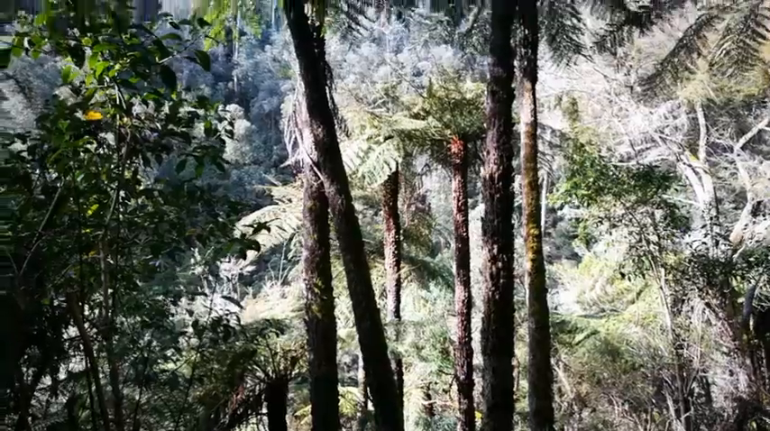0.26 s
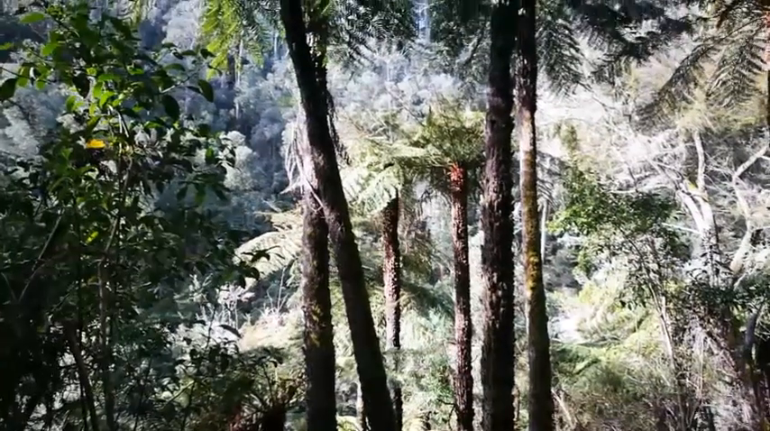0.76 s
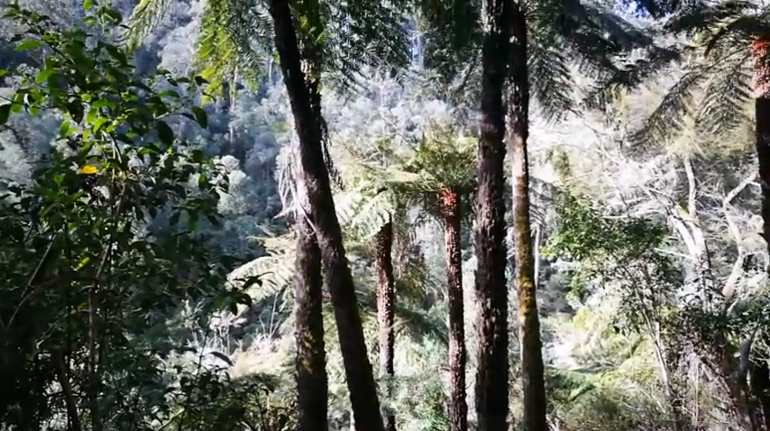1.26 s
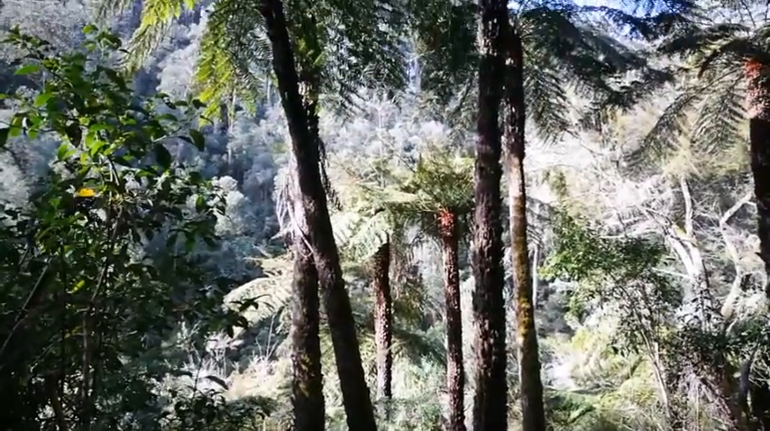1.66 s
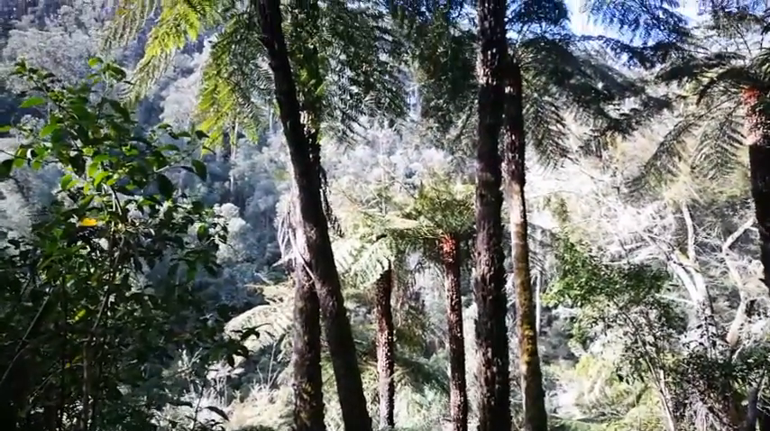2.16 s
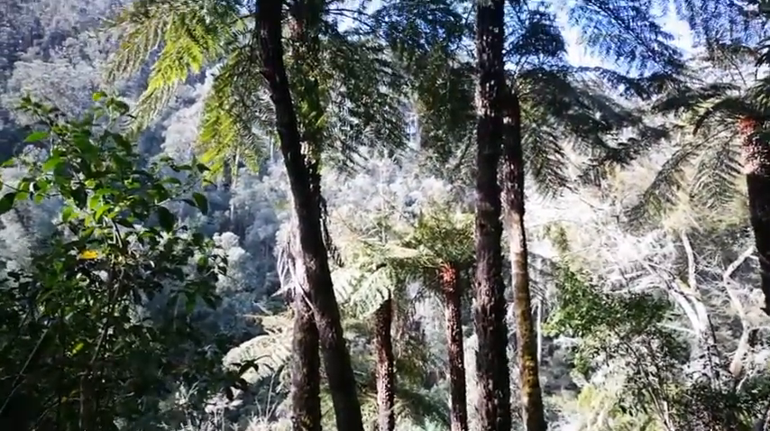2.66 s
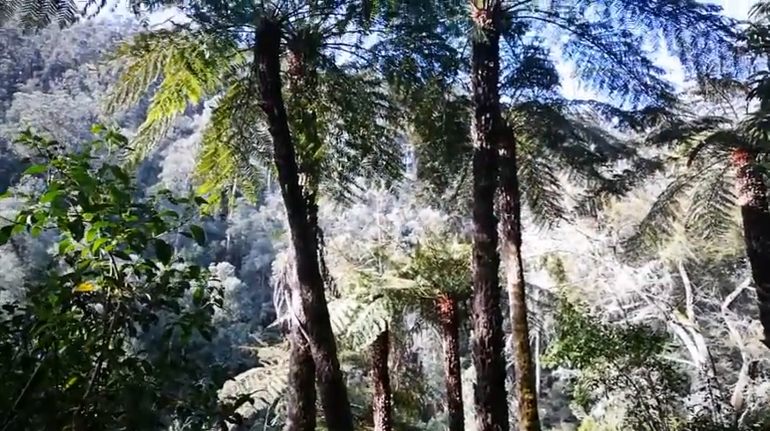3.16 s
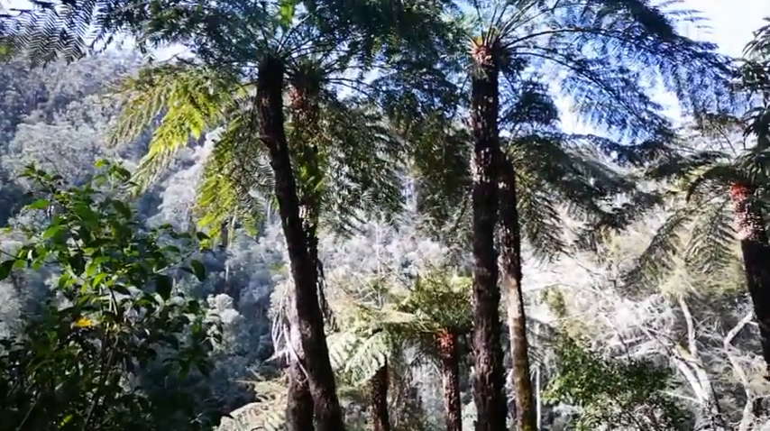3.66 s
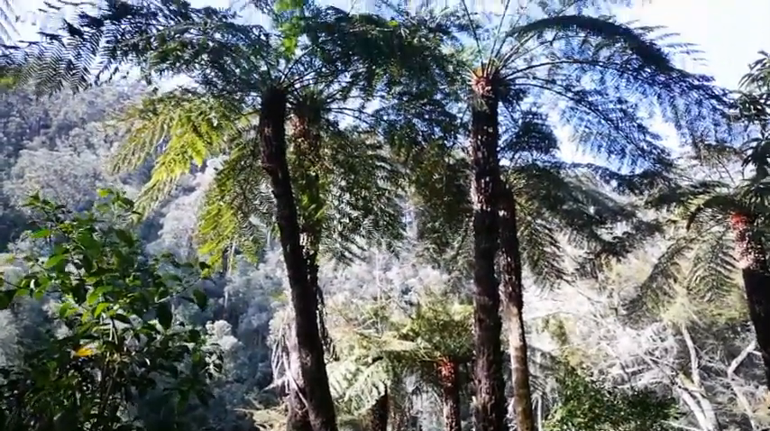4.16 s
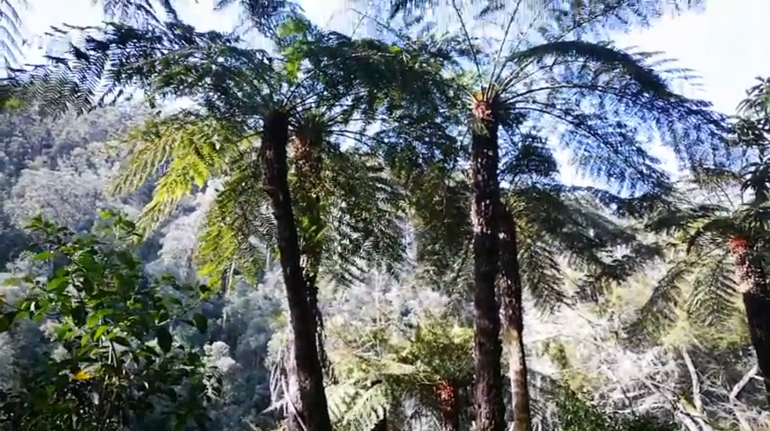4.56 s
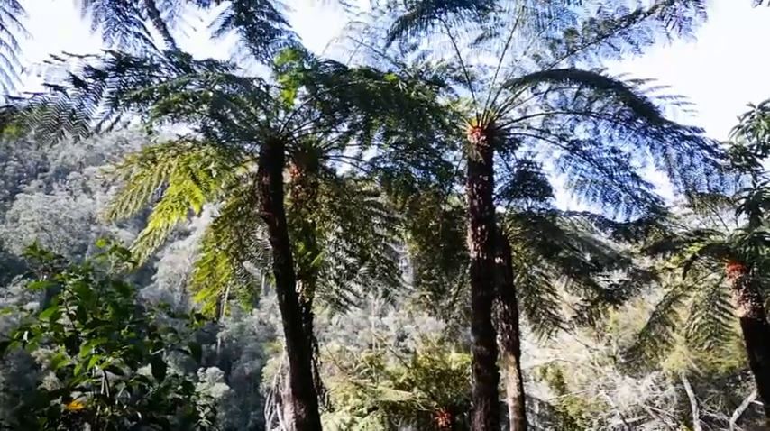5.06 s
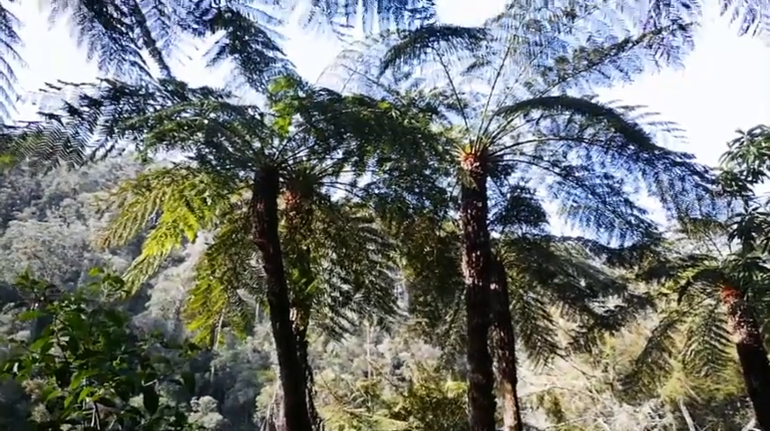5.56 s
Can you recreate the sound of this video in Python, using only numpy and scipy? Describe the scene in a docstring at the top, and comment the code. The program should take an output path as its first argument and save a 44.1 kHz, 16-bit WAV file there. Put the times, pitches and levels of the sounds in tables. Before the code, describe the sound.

Twice, a long high bird whistle snaps into a whip-like crack, followed by a second bird's quick reply, with soft steady hiss behind.

```python
"""In the bush, a small loudspeaker close to the left microphone port loops one phrase of a whipbird duet:
a thin rising whistle, a whip-crack sweep, the mate's two notes and buzzy chips. Notes are gliding sines,
chips are noise through throat resonances; all ring among trees, over the loop's own hiss.
The right port hears the loudspeaker later and duller, round the housing. Faint air, a puff of wind,
a twig tick and a far bird belong to the place itself."""
import sys
import numpy as np
from scipy import signal
from scipy.fft import rfft, irfft, next_fast_len
from scipy.io import wavfile

SR = 44100
rng = np.random.default_rng(int(sys.argv[2]) if len(sys.argv) > 2 else 0)


def transcribe(u):
    """Save the signal u as a 16-bit wav file named by the first command-line argument.

    u: samples, shape (n,) or (channels, n), limited to [-1, 1]; the rate is SR.
    q: integer samples, one column per channel.
    """
    v = np.clip(np.atleast_2d(u).T, -1, 1)
    q = np.round(v * 32767).astype(np.int16)
    wavfile.write(sys.argv[1], SR, q)


N = 256088
PHRASE_START_S, PHRASE_S = 3.278, 3.765


def syrinx(rows):
    """A gliding sine and its octave overtone. Returns the sound and its send to the trees.
    Each row: time in seconds, pitch in Hz, level in dB, overtone in dB, send in dB."""
    s, hz, db, overtone_db, send_db = np.transpose(rows)
    t = np.arange(s[0], s[-1], 1 / SR)
    pitch_hz = np.exp(np.interp(t, s, np.log(hz)))
    phase = 2 * np.pi * np.cumsum(pitch_hz) / SR
    wave = np.sin(phase) + from_db(np.interp(t, s, overtone_db)) * np.sin(2 * phase)
    fades = np.clip(np.minimum(t - s[0], s[-1] - t) / .0044, 0, 1)
    sound = np.sqrt(2) * from_db(np.interp(t, s, db)) * fades * wave
    return sound, from_db(np.interp(t, s, send_db)) * sound


def thin_tone(rows, overtone_db=-50, send_db=-15):
    """A nearly pure syrinx note from rows of time, pitch and level."""
    return syrinx([(*row, overtone_db, send_db) for row in rows])


# Whip-crack sweep. Each row: time in seconds, pitch in Hz, relative level in dB.
WHIP_SWEEP = [(1.172, 722, -55), (1.215, 796, -55), (1.236, 969, -41.5), (1.25, 1256, -36),
              (1.263, 1713, -35.5), (1.273, 2310, -30), (1.281, 3085, -28.5), (1.288, 4370, -24.5),
              (1.292, 5520, -29.5), (1.298, 6200, -42), (1.31, 6710, -38)]


def whip(throat_hz=5600):
    """A fast upward sweep, driest where loudest; the overtone swells through the throat resonance."""
    s, hz, db = np.transpose(WHIP_SWEEP)
    octaves_off = np.abs(np.log2(2 * hz / throat_hz))
    overtone_db = -11.5 - 19 * octaves_off
    send_db = -4.5 + .4 * (db.max() - db)
    return s[0], *syrinx(np.c_[s, hz, db, overtone_db, send_db])


# Rasp resonances. Each row: centre in Hz, width in Hz, relative level in dB.
RASP_BANDS = [(119, 250, -26), (1240, 280, -5), (4230, 2300, 9), (6930, 580, 3), (9060, 240, -7),
              (11200, 2600, -12), (13300, 600, -10), (15500, 400, -23)]


def rasp(peak_s=1.275, lead_s=.04, hold_s=.017, rise_db_per_s=1300, fall_db_per_s=600):
    """Resonant noise at the crack of the whip: steep rise, short hold, slower fall."""
    t = np.arange(0, .15, 1 / SR) - lead_s
    noise = rng.standard_normal(len(t))
    body = sum(from_db(db) * rms_one(formant(noise, hz, width_hz)) for hz, width_hz, db in RASP_BANDS)
    level_db = -34.5 + rise_db_per_s * np.minimum(t, 0) - fall_db_per_s * np.maximum(t - hold_s, 0)
    return peak_s - lead_s, from_db(level_db) * rms_one(body)


# Whistle climbing in small steps. Each row: time in seconds, pitch in Hz, relative level in dB.
WHISTLE_CLIMB = [(3.678, 4317, -66), (3.69, 4510, -58.5), (3.80, 4554, -53.5), (3.869, 4670, -59),
                 (3.939, 4743, -64), (3.99, 4823, -58.5), (4.08, 4890, -63), (4.24, 5014, -65),
                 (4.28, 5070, -56.5), (4.405, 5076, -56), (4.425, 5150, -59), (4.45, 5200, -58.5),
                 (4.519, 5194, -53), (4.6, 5296, -51.5), (4.681, 5373, -50), (4.778, 5340, -56)]
WAVER_PER_S = 70


def rising_whistle(wobble_hz=16):
    """A long thin note whose pitch trembles a little around its line."""
    s, hz, db = np.transpose(WHISTLE_CLIMB)
    t = np.sort(np.r_[np.arange(s[0], s[-1], 1 / WAVER_PER_S), s])
    pitch_hz = np.interp(t, s, hz) + wobble_hz * rng.standard_normal(len(t))
    sound, send = thin_tone(np.c_[t, pitch_hz, np.interp(t, s, db)])
    return s[0], sound * waver(len(sound)), send


def waver(size, share=.45):
    """Moving air between the trunks adds a wandering second path: a gain that flickers and dips."""
    knots = round(size / SR * WAVER_PER_S) + 2
    position = np.linspace(0, knots - 1, size)
    draws = rng.standard_normal((2, knots))
    in_phase, quadrature = (np.interp(position, np.arange(knots), draw) for draw in draws)
    return rms_one(np.hypot(1 + share * in_phase, share * quadrature / 2))


# Note before the whistle. Each row: time in seconds, pitch in Hz, relative level in dB.
WHISTLE_LEAD_IN = [(3.52, 4230, -62), (3.53, 4360, -51), (3.545, 4510, -55), (3.59, 4545, -67)]
# End of the whistle. Each row: time in seconds, relative level in dB.
WHISTLE_CLOSE = [(4.775, -56), (4.783, -39.5), (4.798, -43), (4.808, -55), (4.826, -43), (4.862, -46),
                 (4.89, -55), (4.922, -57), (4.94, -66)]


def whistle_ends(close_hz=5316):
    """A short lead-in note, and a loud close on one pitch: two pulses and a faint tail."""
    close = [(s, close_hz, db) for s, db in WHISTLE_CLOSE]
    return [(rows[0][0], *thin_tone(rows)) for rows in (WHISTLE_LEAD_IN, close)]


# Effort of the falling note. Each row: time in seconds, relative level in dB.
FALL_EFFORT = [(1.848, -44), (1.856, -45), (1.879, -36), (1.902, -35.5), (1.918, -39), (1.931, -48),
               (1.941, -58)]


def falling_note(from_hz=3763, to_hz=1212, hold_s=.031, overtone_db=-45, send_db=-1):
    """The mate holds a pitch, then slides straight down."""
    s, db = np.transpose(FALL_EFFORT)
    t = np.arange(s[0], s[-1], .002)
    hz = np.interp(t, [s[0] + hold_s, s[-1]], [from_hz, to_hz])
    return s[0], *thin_tone(np.c_[t, hz, np.interp(t, s, db)], overtone_db, send_db)


# Dipping note. Each row: time in seconds, pitch in Hz, relative level in dB, overtone in dB.
DIP_GLIDE = [(2.083, 3830, -47, -42), (2.112, 3050, -40.5, -44), (2.128, 2869, -38, -32),
             (2.143, 2980, -44, -35), (2.152, 3384, -37, -8), (2.162, 4000, -48.5, -23),
             (2.18, 4130, -38, -18), (2.21, 4175, -34, -37), (2.255, 4205, -39, -32),
             (2.30, 4140, -55.5, -24), (2.329, 4180, -68, -25)]


def dipping_note():
    """The mate's pitch dips and climbs; the loud high end stands furthest out of its echo."""
    s, hz, db, overtone_db = np.transpose(DIP_GLIDE)
    send_db = np.minimum(-11.5 + 2.16 * (db.max() - db), 2)
    return s[0], *syrinx(np.c_[s, hz, db, overtone_db, send_db])


# Buzzy chips. Each row: start in seconds, length in seconds, relative level in dB.
CHIP_CALLS = [(1.817, 0.027, -49), (2.045, 0.02, -46.5), (3.224, .055, -54.5)]
# Throat resonances. Each row: centre in Hz, width in Hz, gain in dB.
THROAT_BANDS = [(3200, 1100, -5), (4480, 380, 3), (5600, 900, -8), (6900, 800, -4)]


def chips(pulse_hz=134.4, send_db=-2.5):
    """Short bursts of throbbing breath noise through the throat resonances."""
    for start_s, length_s, level_db in CHIP_CALLS:
        t = np.arange(0, length_s, 1 / SR)
        breath = rng.standard_normal(len(t)) * (1 + .16 * np.sin(2 * np.pi * pulse_hz * t))
        voiced = sum(from_db(db) * formant(breath, hz, width_hz) for hz, width_hz, db in THROAT_BANDS)
        voiced = butterworth(voiced, 6, 8000)
        fades = np.clip(np.minimum(t, length_s - t) / .008, 0, 1)
        sound = from_db(level_db) * rms_one(voiced) * fades
        yield start_s, sound, from_db(send_db) * sound


# Ringing among the trunks. Each row: band centre in Hz, near echo level in dB, near T60 in seconds,
# far echo level in dB, far T60 in seconds.
TREE_ECHOES = [(844, -16, 0.11, -8.5, 0.3), (1820, -1.5, 0.067, -8.5, 1.2), (3140, -0.5, 0.2, -6, 0.98),
               (4300, 2.5, 0.24, -7, 1.57), (6160, 7.5, 0.27, -5.5, 1.5), (10040, 9.5, 0.29, -38, .4)]


def trees(send, trunks_per_s=5000):
    """Separate trunks return a dense, grainy scatter of echoes that dies band by band."""
    t = np.arange(2 * SR) / SR
    centres_hz = np.array(TREE_ECHOES)[:, 0]
    edges_hz = np.r_[300, np.sqrt(centres_hz[1:] * centres_hz[:-1]), 16000]
    trunks = rng.random((2, len(t))) < trunks_per_s / SR
    echoes = np.zeros(len(t))
    for (_, near_db, near_s, far_db, far_s), low, high in zip(TREE_ECHOES, edges_hz, edges_hz[1:]):
        near, far = butterworth(trunks * rng.standard_normal(trunks.shape), 2, [low, high], "band")
        band_share = (high - low) / (SR / 2)
        for scatter, db, t60_s in ((near, near_db, near_s), (far, far_db, far_s)):
            decay = from_db(-60 * t / t60_s)
            echoes += from_db(db) * rms_one(scatter) * decay * np.sqrt(band_share / np.sum(decay ** 2))
    echoes *= np.clip((t - .001) / .0078, 0, 1)   # ground and twigs answer within a few ms
    return signal.fftconvolve(send, echoes)[:len(send)]


def duet(ground_delay_s=.001203, ground_db=-25):
    """One round of calls with ground and tree echoes, cut off where the loop restarts."""
    t = np.arange(round(PHRASE_S * SR)) / SR
    direct, to_trees = np.zeros((2, len(t)))
    calls = [rising_whistle(), *whistle_ends(), whip(), falling_note(), dipping_note(), *chips()]
    for start_s, sound, send in calls:
        add(direct, phrase_time(start_s), sound)
        add(to_trees, phrase_time(start_s), send)
    add(direct, ground_delay_s, from_db(ground_db) * direct)
    start_s, sound = rasp()
    add(direct, phrase_time(start_s), sound)
    cut = np.clip((t[-1] - t) / .001, 0, 1)
    return (direct + trees(to_trees)) * cut


# Hiss of the loop. Each row: frequency in Hz, relative density in dB.
HISS_SPECTRUM = [(110, -54), (180, -22), (377, -2.5), (595, -1.5), (734, 0.5), (1080, -1), (1590, -7.5),
                 (2300, -8.5), (3210, -6.5), (4900, -7), (6490, -5), (9220, -12.5), (9890, -20),
                 (10600, -30.5), (12000, -32.5), (15600, -67.5), (22000, -120)]


def loop_hiss(size, fade_in_s=.022, sag_db_per_s=1.0):
    """Hiss that comes up quickly at the start of the phrase, then slowly sags."""
    t = np.arange(size) / SR
    level_db = -53.5 - 7 * np.clip(1 - t / fade_in_s, 0, 1) - sag_db_per_s * t
    return from_db(level_db) * coloured(HISS_SPECTRUM, size)


def loudspeaker(gain_db=5.5, right_hiss_db=-4):
    """The looped duet and hiss reach the left port directly, the right port round the housing."""
    phrase = duet()
    looped = (np.arange(N) - round(PHRASE_START_S * SR)) % len(phrase)
    birds = phrase[looped]
    hiss = loop_hiss(len(phrase))[looped]
    right = right_port(birds + from_db(right_hiss_db) * hiss)
    return from_db(gain_db) * np.array([birds + hiss, right])


# Path to the right port. Each row: frequency in Hz, loss in dB, phase lag in radians.
HOUSING_SHADOW = [(20, 0, 0), (200, 1, .2), (250, 1, 1.2), (650, 5.5, 3.1), (1000, 11, 4.5),
                  (1550, 25, 7.5), (2000, 15, 9.3), (2200, 8.5, 10), (2500, 16, 11.8), (2900, 4.5, 11.8),
                  (3200, 11, 12.6), (3550, 5.5, 13.2), (3900, 20, 14.7), (4300, 9, 14.6), (5080, 23, 17.5),
                  (5350, 11, 16.3), (5900, 27, 18.5), (6500, 30, 17.8), (8600, 19, 23), (10500, 12, 28),
                  (16000, 22, 40)]


def right_port(x, scatter_db=-29, scatter_t60_s=.36):
    """The housing shadows and delays the sound; things nearby scatter a little of it back."""
    tail = SR // 2
    size = next_fast_len(N + tail)
    hz = np.arange(size // 2 + 1) * SR / size
    path = from_db(-at_hz(HOUSING_SHADOW, hz)) * np.exp(-1j * at_hz(HOUSING_SHADOW, hz, column=2))
    decay = from_db(-60 * np.arange(tail) / SR / scatter_t60_s)
    scatter = from_db(scatter_db) * rng.standard_normal(tail) * decay / np.sqrt(np.sum(decay ** 2))
    return irfft(rfft(x, size) * (path + rfft(scatter, size)), size)[:N]


# Air of the place. Each row: frequency in Hz, relative density in dB, left-right coherence from 0 to 1.
AIR_SPECTRUM = [(20, 6.5, 1), (32, 3.5, 0.82), (45, -7, .96), (60, 3, 0.99), (80, -8.5, .93),
                (122, -5, 0.66), (250, -22, .5), (600, -2, 0.24), (1410, -0.5, .1), (4000, -54.5, .05),
                (9000, -34, .02), (16000, -22.5, 0.012)]


def air(level_db=-71.5):
    """Faint steady air, alike at both ports in the bass only."""
    hz = np.arange(N // 2 + 1) * SR / N
    coherence = at_hz(AIR_SPECTRUM, hz, column=2)
    mid, side = rfft(rng.standard_normal((2, N)))
    ports = np.sqrt(1 + coherence) * mid + np.sqrt(1 - coherence) * side * [[1], [-1]]
    return from_db(level_db) * rms_one(irfft(ports * from_db(at_hz(AIR_SPECTRUM, hz)), N))


# Puff dying away. Each row: time in seconds, rumble in dB, leaf hiss in dB.
PUFF_LEVELS = [(0, -74, -76), (.4, -72, -77), (.7, -76, -79), (.8, -79, -100), (1.2, -110, -115)]


def wind_puff():
    """Wind rumbles on both ports and stirs the leaves."""
    s, rumble_db, leaves_db = np.transpose(PUFF_LEVELS)
    t = np.arange(N) / SR
    rumble = coloured([(15, -5), (30, -7), (70, -10.5), (200, -16.5), (400, -66)], N)
    leaves = np.array([coloured([(1500, -36), (5000, -5), (10000, -9), (16000, -8)], N) for _ in range(2)])
    return from_db(np.interp(t, s, rumble_db)) * rumble + from_db(np.interp(t, s, leaves_db)) * leaves


def twig_tick(start_s=3.344, left_db=-41, right_db=-33):
    """One soft contact rings two damped resonances of a twig."""
    impulse = np.zeros(N)
    impulse[round(start_s * SR)] = 1
    ring = resonate(impulse, hz=2200, width_hz=700) + resonate(impulse, hz=5300, width_hz=1500)
    tick = butterworth(ring, 2, 8000)
    return from_db([[left_db], [right_db]]) * tick / np.max(np.abs(tick))


# Far bird's note. Each row: time in seconds, pitch in Hz, relative level in dB.
FAR_NOTE = [(4.58, 2620, -80), (4.63, 2580, -69), (4.75, 2465, -68), (4.86, 2400, -80), (4.92, 2430, -86)]


def far_bird(pan_db=3):
    """One faint, slightly sinking whistle to the right."""
    track = np.zeros(N)
    sound, _ = thin_tone(FAR_NOTE)
    add(track, FAR_NOTE[0][0], sound)
    return from_db([[-pan_db], [pan_db]]) * track


def from_db(db):
    """Decibels to gain."""
    return 10 ** (np.asarray(db) / 20)


def rms_one(x):
    """Scale to rms 1."""
    return x / np.sqrt(np.mean(x ** 2) + 1e-20)


def at_hz(points, hz, column=1):
    """Read a spectrum on a log-frequency axis."""
    points = np.array(points)
    return np.interp(np.log(np.maximum(hz, 1)), np.log(points[:, 0]), points[:, column])


def coloured(points, size):
    """Noise of rms 1 shaped to (Hz, dB) points."""
    hz = np.arange(size // 2 + 1) * SR / size
    return rms_one(irfft(rfft(rng.standard_normal(size)) * from_db(at_hz(points, hz)), size))


def resonate(x, hz, width_hz):
    """Two-pole resonance with peak gain 1."""
    r = np.exp(-np.pi * width_hz / SR)
    feedback = [1, -2 * r * np.cos(2 * np.pi * hz / SR), r * r]
    return signal.lfilter(np.array([1, 0, -1]) * (1 - r * r) / 2, feedback, x)


def formant(x, hz, width_hz):
    """Two equal resonances in series."""
    return resonate(resonate(x, hz, width_hz), hz, width_hz)


def butterworth(x, order, hz, kind="low"):
    """Filter with a flat passband."""
    return signal.sosfilt(signal.butter(order, hz, kind, fs=SR, output="sos"), x)


def add(track, start_s, sound):
    """Mix a sound into a track."""
    at = round(start_s * SR)
    track[at:at + len(sound)] += sound[:len(track) - at]


def phrase_time(scene_s):
    """Seconds since the phrase last began."""
    return (scene_s - PHRASE_START_S) % PHRASE_S


def scene():
    """Loudspeaker and place together, left and right."""
    return loudspeaker() + air() + wind_puff() + twig_tick() + far_bird()


def record(dry):
    """A steep low-pass cuts the top treble."""
    return signal.sosfilt(signal.cheby2(24, 70, 15720, fs=SR, output="sos"), dry)


dry = scene()
out = record(dry)
transcribe(out)
```